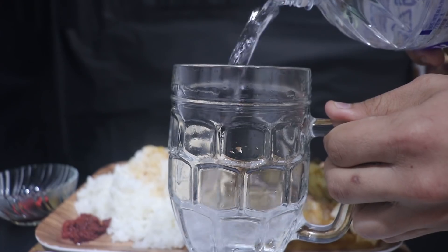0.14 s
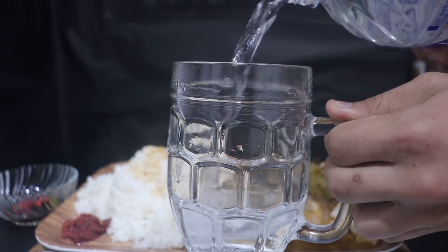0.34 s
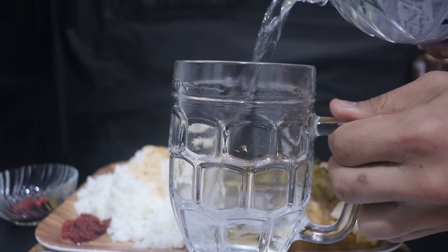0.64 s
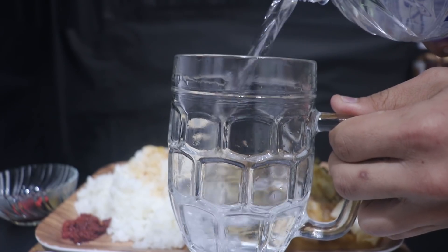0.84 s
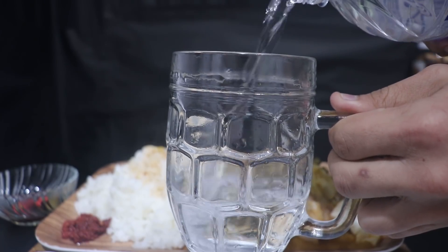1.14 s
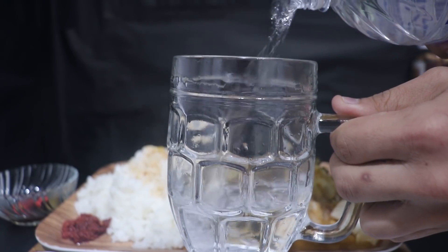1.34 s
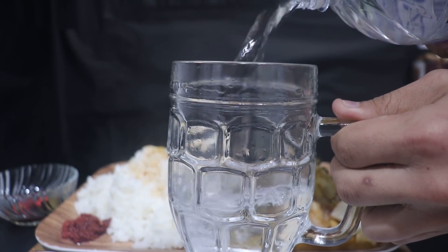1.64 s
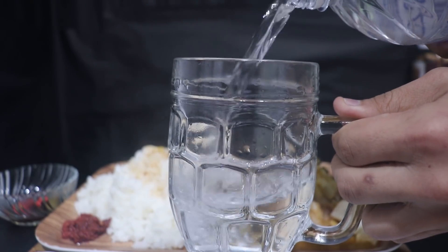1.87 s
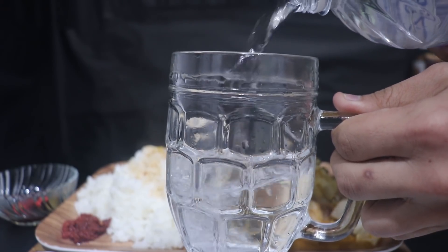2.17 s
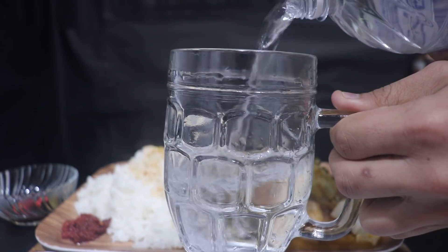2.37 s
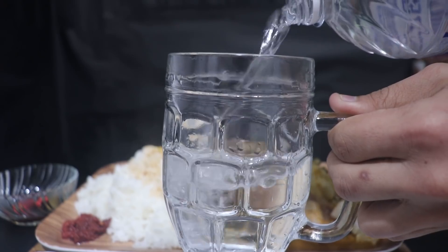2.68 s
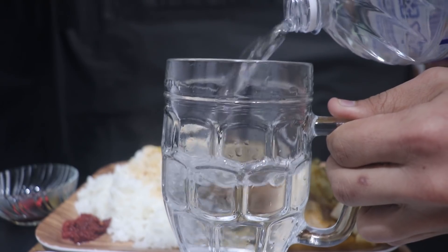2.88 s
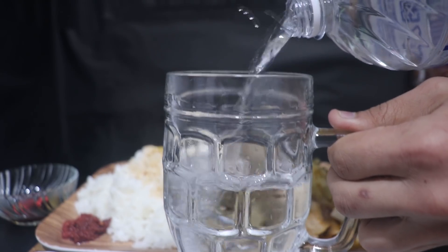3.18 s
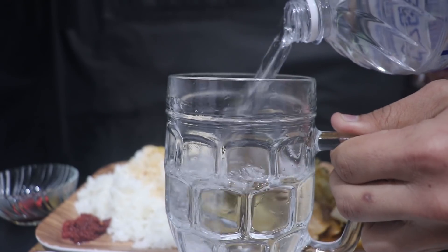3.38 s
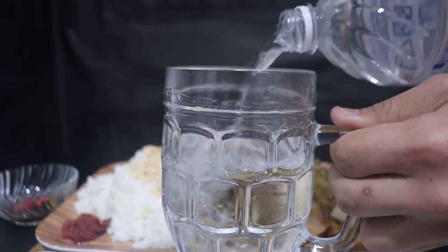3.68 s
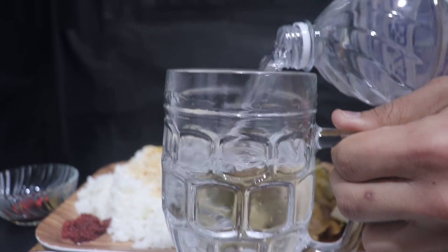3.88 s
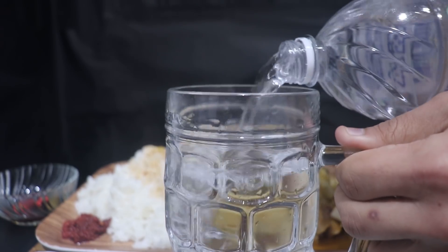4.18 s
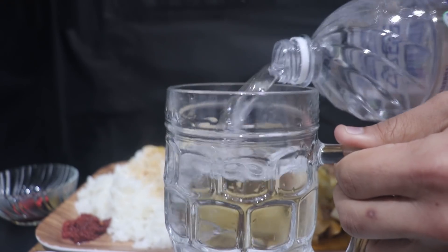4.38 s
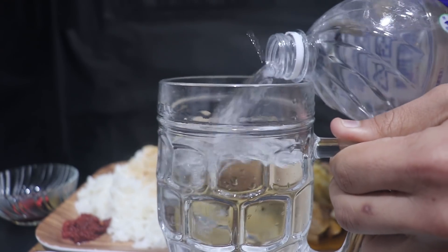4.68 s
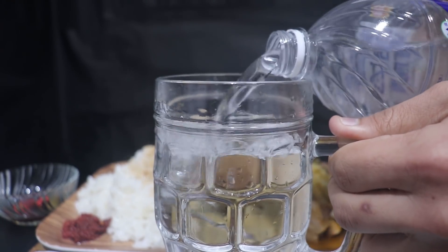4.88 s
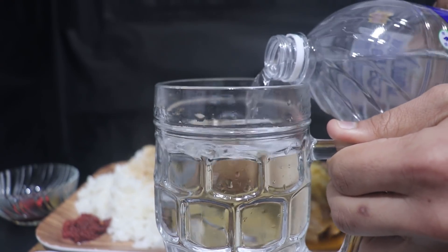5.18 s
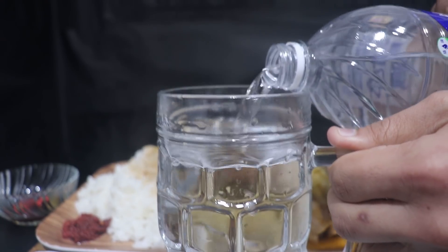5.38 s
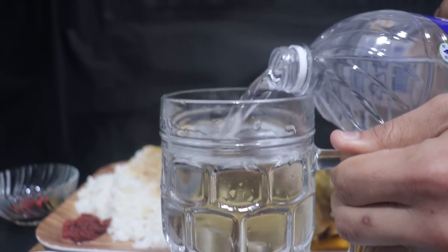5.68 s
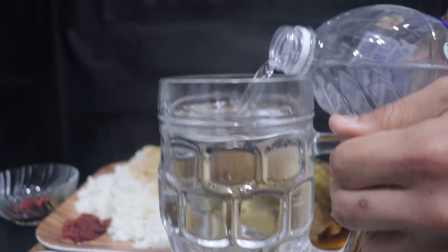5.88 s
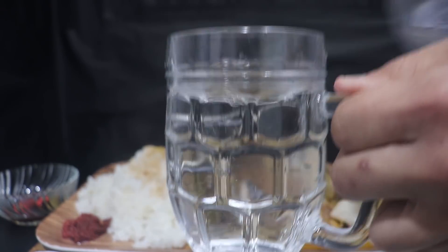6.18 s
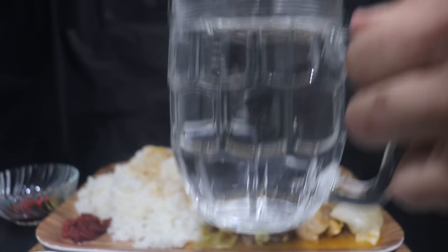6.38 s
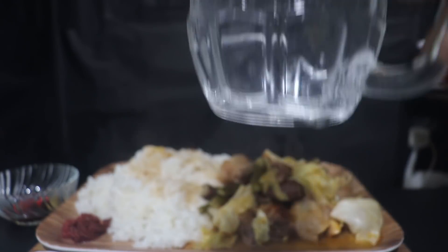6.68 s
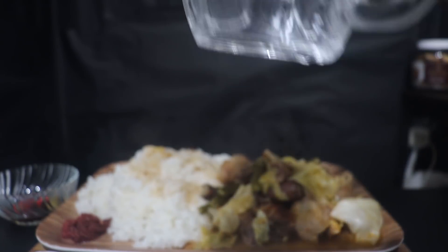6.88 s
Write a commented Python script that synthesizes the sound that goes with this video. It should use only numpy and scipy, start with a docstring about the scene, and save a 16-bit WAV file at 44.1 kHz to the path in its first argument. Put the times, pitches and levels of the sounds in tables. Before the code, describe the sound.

A close, detailed pour in a quiet small room with a faint, low steady hush. From 0 s water falls from a plastic bottle into a glass mug in lumpy slugs: sharp wet snaps, hollow round plops, churning bubbles and fine fizz, with a slight glassy ring. Under it the bottle gulps air about nine times a second, each a short downward chirp with a low hum that grows as it empties. Until about 1.4 s the hollow tone stays low, then climbs by nearly an octave towards 5 s. Strong splashes stand out around 3.1, 3.7, 4.3 and 4.6 s. From 4.2 s the spray thins to separate bright bloops and drips, ending near 5.2 s. Quiet follows until 5.95-6.2 s, when the plastic pops back with low thumps, clicks and crackles. At 6.6 s comes one short dull set-down knock, then only room hush.

```python
"""Water glugs from a plastic bottle into a glass mug close to a microphone. Each slug of water snaps on the
surface, traps ringing bubbles and fizz (damped, gliding sines and filtered noise) and sounds the air column,
a resonance whose pitch rises as the mug fills. Air gulped into the bottle chirps downward and hums.
Afterwards the plastic pops back, crackles in bursts of noise and is set down in a quiet room."""
import sys
import numpy as np
from scipy import signal
from scipy.fft import rfft, irfft, next_fast_len
from scipy.io import wavfile
from scipy.ndimage import uniform_filter1d, map_coordinates

SR = 44100
rng = np.random.default_rng(int(sys.argv[2]) if len(sys.argv) > 2 else 0)


def dump(signal):
    """Clip the signal to [-1, 1] and save it as 16-bit WAV at the path in sys.argv[1]."""
    limited = np.clip(np.atleast_2d(signal).T, -1, 1)
    pcm = np.round(limited * 32767).astype(np.int16)
    wavfile.write(sys.argv[1], SR, pcm)


N = 310023


def amp(db):
    """Decibel law: the amplitude ratio of a level in dB."""
    return 10 ** (np.asarray(db) / 20)


def unit(x):
    """Normalisation: x at rms 1."""
    return x / np.sqrt(np.mean(x ** 2) + 1e-20)


def curves(rows):
    """Linear interpolation: one value per sample for each column after the time."""
    s, *cols = np.transpose(rows)
    return [np.interp(np.arange(N) / SR, s, c) for c in cols]


def filtered(x, response):
    """Linear filtering: the spectrum of x times a response of frequency."""
    m = next_fast_len(N + 8192)
    return irfft(rfft(x, m) * response(np.fft.rfftfreq(m, 1 / SR)), m)[:N]


def coloured(x, points):
    """Spectral shaping: x filtered through (Hz, dB) points, at rms 1."""
    f, db = np.transpose(points)
    return unit(filtered(x, lambda hz: amp(np.interp(np.log(hz + 1), np.log(f), db))))


def resonance(f, square_hz, width_hz):
    """Driven damped oscillator: response at f of a mode of this squared frequency, peak 1."""
    return 1j * f * width_hz / (square_hz - f * f + 1j * f * width_hz)


def wobble(rate):
    """Slow random modulation: a smooth curve, rate knots a second."""
    knots = rng.standard_normal(int(N * rate / SR) + 4)
    return map_coordinates(knots, [np.arange(N) * rate / SR])


def add(track, s, sound):
    """Superposition: mixes a sound in at time s."""
    part = track[round(s * SR):][:len(sound)]
    part += sound[:len(part)]


def grains(per_s, low_hz, high_hz, cycles, spread_db, size):
    """Bubble resonance in bulk: damped sines of random strength and life, a few of which climb in pitch."""
    when, pitch, chance, life, climb = rng.random((round(per_s * N / SR), 5)).T[:, :, None]
    turns = low_hz * (high_hz / low_hz) ** pitch * np.arange(size) / SR
    decay = np.exp(-turns / (cycles * 10 ** (life - .5)))
    fade = (1 - np.exp(-turns)) * decay * np.hanning(2 * size)[size:]
    strength = amp(-spread_db * np.log(1 - .97 * chance))
    bend = .014 * climb ** 3  # most hold their pitch
    sound = strength * fade * np.sin(2 * np.pi * turns * (1 + bend * turns))
    where = (when * N).astype(int) + np.arange(size)
    return unit(np.bincount(where.ravel(), sound.ravel(), N)[:N])


# The air above the water. Each row: time in seconds, resonance in Hz.
AIR_COLUMN = [(0, 723), (1.4, 727), (3, 1006), (4.3, 1077), (5.2, 1400)]


def along_column(steps, play):
    """Time-varying resonance: a cross-fade over fixed filters, play(air_hz), as the column shortens."""
    hz, = curves(AIR_COLUMN)
    place = np.interp(hz, steps, np.arange(len(steps)))
    return sum(np.clip(1 - abs(place - k), 0, 1) * play(air_hz) for k, air_hz in enumerate(steps))


def air_column(x, width_hz):
    """Column resonance: the air above the water selects a band that rises as the mug fills."""
    hz, = curves(AIR_COLUMN)
    steps = np.geomspace(hz.min(), hz.max(), 14)
    return along_column(steps, lambda c: filtered(x, lambda f: resonance(f, c * c, width_hz)))


LIFT = 0.88  # how strongly the shortening column raises the mug's ringing
# The mug's ringing across its width. Each row: frequency in Hz before the column's lift,
# width in Hz, level in dB.
GLASS_MODES = [(2400, 21, 5.5), (3750, 380, -8), (5133, 35, 2)]


def mug(x):
    """Modal resonance: the mug adds its ringing to whatever strikes it, a little higher as it fills."""
    hz, = curves(AIR_COLUMN)
    steps = np.linspace(hz.min(), hz.max(), 6)

    def ring(air_hz):
        lift = (LIFT * air_hz) ** 2
        return filtered(x, lambda f: sum(amp(db) * resonance(f, c * c + lift, w) for c, w, db in GLASS_MODES))
    return x + along_column(steps, ring)


LEAD_DB_PER_S, FALL_DB_PER_S = 1103, 270  # spatter builds up before a snap and dies after it
# The steady spatter around the jet. Each row: time in seconds, level in dB.
SPRAY_LEVEL = [(0, -44), (.25, -37), (.53, -44.5), (.95, -39.5), (1.39, -45), (1.84, -39.5), (2.08, -35),
               (2.14, -46.5), (2.22, -39.5), (2.75, -45), (3.4, -43), (3.66, -40.5), (4.07, -49.5),
               (4.3, -52), (4.83, -53), (5.16, -60)]


def splash(ending):
    """Energy summation: the spatter's level in dB, from the steady spray and a burst around every snap."""
    t, (spray_db,) = np.arange(N) / SR, curves(np.vstack([SPRAY_LEVEL, ending]))
    power = amp(spray_db) ** 2
    for s, _, _, db in SNAP_ROWS:
        power += amp(db - np.maximum(LEAD_DB_PER_S * (s - t), FALL_DB_PER_S * (t - s))) ** 2
    return 10 * np.log10(power)


# The jet churning the water. Each row: time in seconds, level in dB before splashes swell it.
POUR_LEVEL = [(0.0, -59), (0.3, -39.5), (0.5, -40), (1.01, -37), (1.3, -36.5), (1.97, -41), (2.21, -39.5),
              (2.56, -34.5), (2.98, -43.5), (3.9, -37.5), (4.22, -48), (4.84, -47), (5.16, -54)]
# The churning's colour. Each row: frequency in Hz, filter gain in dB.
CHURN_COLOUR = [(150, -59), (250, -31), (480, -14), (675, -6), (1320, -6.5), (3500, -19), (4550, -49),
                (7700, -120)]


def churn(lumps, splash_db, ending):
    """Turbulent excitation: middle bubbles under the jet swell with each splash and sound the column."""
    churn_db, = curves(np.vstack([POUR_LEVEL, ending]))
    water = grains(520, 331.0, 3015, cycles=7.0, spread_db=5.5, size=700) + 0.3 * rng.standard_normal(N)
    water = unit(lumps * coloured(water, CHURN_COLOUR))
    column = unit(air_column(water, width_hz=160))
    return amp(churn_db + 0.51 * (splash_db + 42.5)) * (0.71 * water + 0.79 * column)


# The fizz's colour. Each row: frequency in Hz, filter gain in dB.
FIZZ_COLOUR = [(760, -4.5), (1300, -7), (2120, -8.5), (5180, -10), (6070, -16.5), (8910, -6), (15200, -20),
               (16500, -52)]


def fizz(lumps, splash_db):
    """Small-bubble resonance: high grains spatter and ring the mug."""
    small = grains(2600, 1100, 6500, cycles=14, spread_db=4.6, size=330) + .27 * rng.standard_normal(N)
    small += 0.57 * grains(220, 5660, 14160, cycles=9.3, spread_db=7.5, size=110)  # sparse droplet ticks
    uneven = lumps * amp(2.6 * wobble(60)) * coloured(small, FIZZ_COLOUR)
    return amp(splash_db) * unit(mug(uneven))


def stream():
    """Common modulation: churn and fizz share one lumpy flow and one splash level."""
    ending = [5.2, -80]  # seconds, dB
    splash_db = splash(ending)
    lumps = amp(2.2 * wobble(28))
    return churn(lumps, splash_db, ending) + fizz(lumps, splash_db)


HUSH_DB = -51
# Room and microphone noise. Each row: frequency in Hz, filter gain in dB.
HUSH_COLOUR = [(20, -6.5), (170, -4.5), (541, -13.5), (677, -14), (2210, -21.5), (14600, -29),
               (16800, -33.5)]


def hush():
    """Stationary noise: the steady background of room and microphone."""
    return amp(HUSH_DB) * coloured(rng.standard_normal(N), HUSH_COLOUR)


def room(x, t60):
    """Exponential reverberation: a short dull tail from nearby surfaces."""
    t = np.arange(SR // 4) / SR
    dull = uniform_filter1d(rng.standard_normal(len(t)), size=3)
    tail = dull * amp(-60 * t / t60) * (t > .003)
    return signal.fftconvolve(x, tail / np.linalg.norm(tail))[:N]


CLICK_HZ = 10300  # snaps dull above this
# Drops hitting the surface. Each row: start in seconds, level in dB, pitch in Hz,
# level in dB of the spatter thrown up.
SNAP_ROWS = [(0.019, -13.5, 9040, -36), (0.0575, -20, 3800, -34), (0.084, -18, 2260, -32.5),
             (0.156, -27, 2450, -43), (0.3147, -15.5, 7900, -41), (0.389, -32, 4360, -51),
             (0.402, -15, 4120, -33), (.413, -20, 6840, -45), (0.596, -23, 1850, -39),
             (0.6237, -37, 2600, -36), (0.734, -20.5, 3900, -34), (0.828, -28, 2200, -35.5),
             (0.902, -22, 3780, -68), (1.0707, -25.5, 3540, -30.5), (1.179, -36, 1490, -58),
             (1.262, -25, 3500, -31.5), (1.313, -27, 9450, -38.5), (1.397, -27.5, 1550, -59),
             (1.437, -19, 1690, -63), (1.5519, -20, 2760, -29), (1.663, -26, 7200, -30.5),
             (1.76, -16.5, 1570, -57), (1.878, -23.5, 2780, -32.5), (1.92, -24, 3320, -25.5),
             (1.982, -23, 3530, -28.5), (2.0475, -26.5, 5010, -32.5), (2.328, -16, 4000, -32.5),
             (2.384, -17.5, 2490, -65), (2.428, -15.5, 4520, -28.5), (2.658, -35, 1590, -61),
             (2.859, -32, 1890, -43.5), (3.087, -17, 1790, -32), (3.1105, -8.5, 5060, -25),
             (3.225, -20.5, 3280, -30), (3.302, -24.5, 3170, -38), (3.476, -26, 1770, -57),
             (3.5205, -22.5, 5500, -85), (3.569, -25, 7500, -32.5), (3.701, -15, 3610, -30),
             (3.712, -10, 5020, -40), (3.8186, -19, 4330, -34.5), (3.874, -24.5, 7600, -39),
             (3.9336, -15, 7950, -52), (4.0015, -25.5, 5770, -67), (4.087, -25, 7900, -35.5),
             (4.157, -24.5, 1490, -33.5), (4.174, -25, 3740, -35), (4.182, -22, 8350, -51),
             (4.225, -28.5, 10000, -60), (4.277, -28.5, 1940, -59), (4.327, -9.5, 5460, -34),
             (4.338, -19, 8300, -54), (4.4532, -16, 4770, -29), (4.518, -36, 3700, -33),
             (4.546, -30, 9300, -55), (4.6078, -9.5, 3030, -31), (4.6396, -25, 7700, -50),
             (4.657, -30, 7460, -61), (4.731, -24.5, 8700, -39.5), (4.8634, -19.5, 2940, -31.5),
             (5.013, -37, 4340, -41), (5.107, -29, 7700, -63)]


def snaps():
    """Impact radiation: a drop clicks, rings briefly and scatters droplets of other pitches within 25 ms."""
    out, t = np.zeros(N), np.arange(SR // 100) / SR

    def ping(hz, cycles):
        return np.sin(2 * np.pi * hz * t) * (1 - np.exp(-2 * t * hz)) * np.exp(-t * hz / cycles)
    noise = rng.standard_normal((len(SNAP_ROWS), len(t) + 2))
    clicks = (noise[:, 2:] - noise[:, :-2]) * amp(-60 * t / 0.012)  # the difference thins the bass
    for (s, db, hz, _), scatter, click in zip(SNAP_ROWS, rng.random((len(SNAP_ROWS), 7, 2)), clicks):
        add(out, s, amp(db) * (ping(hz, cycles=8.6) + hz / 20000 * click))  # small drops click hardest
        for late, pitch in scatter:
            droplet = ping(hz * 2.8 ** (pitch - .4), cycles=5.9)
            add(out, s + 0.025 * late ** 3, amp(db - 5.0 - 18.5 * late) * droplet)
    return filtered(out, lambda f: 1 / (1 + 1j * f / CLICK_HZ))


WITH_SNAP_S = .01  # this close to a snap a slug has hit hard


def hard(s):
    """Coincidence: true when a snap lands at about time s."""
    return min(abs(s - row[0]) for row in SNAP_ROWS) < WITH_SNAP_S


SLAP_S = 0.00026  # time scale of the slap's pulse


def slap():
    """Impact pressure: one brief two-sided pulse."""
    u = np.arange(SR // 200) / SR / SLAP_S
    return u * (u - 2) * np.exp(1 - u)


REACH_OCTAVES = 0.76  # a climbing pocket has reached the surface after this glide


def pocket(s, db, hz, glide, rise, t60, waver):
    """Bubble oscillation: a pocket swells, rings, glides, then bursts; a sudden one closes with a thud."""
    rise = max(rise, 1e-4)
    life = min(t60 / 3, REACH_OCTAVES / max(glide, 1))
    t = np.arange(round((rise + life + 0.047) * SR)) / SR
    octaves = glide * np.minimum(t, rise + life + 0.0113)
    phase = 2 * np.pi * np.cumsum(hz * 2 ** octaves * waver[round(s * SR):][:len(t)]) / SR
    swell = np.sin(np.pi / 2 * np.clip(t / rise, 0, 1)) * amp(-60 * np.maximum(t - rise, 0) / t60)
    thud = 0.0051 / (rise + 0.000042) * t * hz * np.exp(-1.6 * t * hz)
    burst = amp(-60 * np.maximum(t - rise - life, 0) / 0.042)
    return amp(db) * (swell * burst + thud) * np.sin(phase)


# swell and t60 in cycles; a climbing pocket rings longer, in cycles for each octave a second
RISE_CYCLES, RING_CYCLES, RING_PER_GLIDE = 0.63, 58, 11.5
# a hard hit slaps over a pocket (dB re pocket); pockets above BIG_HZ slap less, and all harder as the mug fills
SLAP_DB, BIG_HZ = 11, 550
# Air pockets trapped under the surface. Each row: start in seconds, level in dB, starting pitch in Hz,
# glide in octaves per second.
POCKET_ROWS = [(.054, -31, 787, 3.5), (0.157, -26.5, 1640, 1), (0.317, -21.5, 1610, -13),
               (.828, -23, 528, 6.5), (1.02, -30, 1810, 8), (1.044, -25.5, 528, 2), (1.438, -25, 442, -4),
               (1.522, -35.5, 426, 6), (1.66, -33, 356, 7), (1.747, -23.5, 492, 4), (1.919, -31.5, 320, 2),
               (2.047, -30.5, 447, -0.5), (2.287, -26.5, 497, -7.5), (2.43, -22.5, 338, 0),
               (2.433, -21.5, 1480, -6), (2.556, -26, 374, 1), (2.655, -24.5, 360, -2.5),
               (2.292, -22, 808, -0.5), (2.86, -19, 345, 4), (2.865, -23.5, 633, 10),
               (3.107, -22.5, 1570, 7), (3.11, -39.5, 484, -11), (3.224, -26, 505, -4.5),
               (3.566, -21.5, 400, 0.5), (3.585, -25.5, 821, 21.5), (3.695, -31, 340, 3.5),
               (3.816, -17.5, 679.5, 19), (3.817, -24, 489, 2.5), (3.933, -24, 365.5, 1.5),
               (3.934, -19.5, 770, 9), (4.042, -29, 794, 12), (4.175, -30.5, 554, 1.5),
               (4.328, -23.5, 377, -3.5), (4.43, -36.5, 1870, -3), (4.453, -39.5, 418, 11),
               (4.503, -46, 616, 39), (4.517, -24.5, 1890, -6), (4.608, -24, 858, 9.5), (4.61, -20, 419, 2),
               (4.629, -24, 987, 4.5), (4.736, -33.5, 563, 10), (4.815, -37.5, 1130, 3),
               (4.876, -38.5, 519, 8), (4.902, -40, 624, 21.5), (4.88, -24, 1460, -3), (5.021, -21, 538, 1)]


def trapped_pockets(waver):
    """Bubble damping: each trapped pocket rings for a number of its own cycles."""
    out, (column,) = np.zeros(N), curves(AIR_COLUMN)
    for s, db, hz, glide in POCKET_ROWS:
        t60 = (RING_CYCLES + RING_PER_GLIDE * max(glide, 0)) / hz
        add(out, s, pocket(s, db, hz, glide, RISE_CYCLES / hz, t60, waver))
        fullness = column[round(s * SR)] / column.max()
        add(out, s, hard(s) * amp(db + SLAP_DB) * min(BIG_HZ / hz, 1) * fullness * slap())
    return out


# the hum's pitch varies less than the neck bubble's, whose chirp narrows as the bottle empties
HUM_SCATTER, NECK_DROP_PER_S = 0.14, 0.049
# Air gulped into the bottle neck. Each row: start in seconds, level in dB.
GLUG_ROWS = [(0.064, -36), (0.171, -33), (0.274, -35), (0.387, -34), (0.482, -35), (0.615, -30),
             (0.71, -29.5), (0.831, -28.5), (0.935, -34), (1.047, -31), (1.107, -29.5), (1.226, -23.5),
             (1.31, -32), (1.445, -28), (1.546, -35), (1.699, -29), (1.841, -25.5), (1.989, -25.5),
             (2.096, -31), (2.178, -30), (2.229, -30.5), (2.345, -34), (2.471, -26), (2.524, -27),
             (2.664, -28), (2.769, -26.5), (2.913, -27), (3.031, -30.5), (3.145, -29), (3.256, -28.5),
             (3.379, -33.5), (3.516, -30.5), (3.635, -27), (3.763, -28.5), (3.888, -31), (3.999, -37),
             (4.075, -26.5), (4.159, -31), (4.27, -34.5), (4.548, -25.5), (5.031, -41)]


def glugs():
    """Cavity resonance: the neck bubble grows, so its pitch falls; the bottle's air hums, more as it empties."""
    out, t = np.zeros(N), np.arange(SR // 6) / SR
    for (s, db), vary in zip(GLUG_ROWS, rng.normal(1, 0.07, len(GLUG_ROWS))):
        hz = vary * (120 + 330 * (1 - NECK_DROP_PER_S * s) * np.exp(-t / 0.0049))
        neck = amp(-60 * t / 0.043) * np.sin(2 * np.pi * np.cumsum(hz) / SR)
        hum_level = 0.26 * min(0.16 + s / 3, 1)
        hum_shape = (1 - np.exp(-t / 0.0063)) * amp(-60 * t / 0.33)
        hum = hum_level * hum_shape * np.sin(2 * np.pi * 108 * vary ** HUM_SCATTER * t)
        add(out, s, amp(db) * (neck + hum))
    return out


PULL_PER_S = 12  # slide toward the column: octaves a second per octave of distance; less as it shortens
PLOP_RISE_S, SHARPEN = 0.0059, 2.78  # swell in the empty mug; exponent that sharpens it as the column shortens
HARD_RISE, PLOP_SLAP_DB = 0.6, -15.5  # a hard hit shortens the swell and adds a slap (dB re plop)
# each plop sheds a smaller pocket: dB re plop, widest pitch ratio, fastest octaves a second, t60 in cycles
SHED_DB, SHED_SPAN, SHED_GLIDE, SHED_CYCLES = -18, 2.6, 16, 40
# Slugs of water that set the air column ringing. Each row: start in seconds, level in dB,
# starting pitch in Hz, t60 in seconds.
PLOP_ROWS = [(.125, -22.5, 670, 0.032), (.204, -15, 690, 0.024), (.219, -12, 678, 0.04),
             (.277, -21, 663, 0.048), (.298, -19, 627, 0.029), (.315, -16.5, 588, 0.13),
             (.353, -19.5, 658, 0.15), (0.625, -16.5, 880, 0.041), (.645, -15.5, 690, 0.034),
             (.661, -13.5, 676, 0.063), (0.696, -12.5, 674, 0.04), (.733, -8.5, 795, 0.026),
             (.749, -13.5, 680, 0.099), (.827, -15, 703, 0.11), (.849, -12, 682, 0.062),
             (.902, -15.5, 730, 0.04), (.915, -18, 688, 0.057), (.94, -14, 756, 0.08),
             (.955, -11.5, 678, 0.078), (.99, -15.5, 670, 0.018), (1.043, -16.5, 683, 0.078),
             (1.079, -7, 750, 0.034), (1.178, -9, 867, 0.016), (1.188, -14.5, 680, 0.093),
             (1.236, -20.5, 770, 0.053), (1.262, -8, 710, 0.015), (1.436, -18.5, 694, 0.026),
             (1.521, -16, 760, 0.014), (1.556, -15, 774, 0.073), (1.588, -19, 780, 0.032),
             (1.676, -19, 708, 0.038), (1.718, -9, 786, 0.012), (1.762, -12, 820, 0.03),
             (1.78, -15.5, 858, 0.031), (1.893, -12, 742, 0.01), (1.923, -16, 884, 0.035),
             (1.994, -16.5, 720, 0.065), (2.016, -18, 823, 0.066), (2.045, -16, 875, 0.018),
             (2.43, -8.5, 910, 0.016), (2.44, -9.5, 842, 0.045), (2.478, -18.5, 880, 0.056),
             (2.533, -15, 885, 0.11), (2.656, -13, 947, 0.05), (2.859, -11, 943, 0.064),
             (2.962, -16, 1054, 0.037), (3.108, -14, 952, 0.054), (3.1103, -10.5, 1320, 0.0064),
             (3.226, -19, 1116, 0.027), (3.566, -8, 932, 0.031), (3.679, -23.5, 970, .05),
             (3.711, -18, 943, 0.07), (3.834, -10, 981, 0.067), (3.869, -11.5, 1084, 0.052),
             (3.888, -22, 1030, 0.05), (4.047, -14.5, 1133, 0.077), (4.088, -20.5, 1313, 0.026),
             (4.075, -16, 1193, 0.013), (4.179, -16.5, 1130, 0.078), (4.337, -10, 1102, 0.13),
             (4.452, -13, 1291, 0.099), (4.627, -11, 1510, .04), (4.637, -14.5, 1640, 0.032),
             (4.751, -24, 1580, 0.056), (4.88, -23, 1091, 0.15), (5.009, -26, 965, 0.034),
             (5.025, -22.5, 1503, 0.063)]


def plops(waver):
    """Coupled resonance: each plop slides toward the air column's pitch and sheds a smaller pocket."""
    out, (column,) = np.zeros(N), curves(AIR_COLUMN)
    for (s, db, hz, t60), (late, higher, climb) in zip(PLOP_ROWS, rng.random((len(PLOP_ROWS), 3))):
        air_hz = column[round(s * SR)]
        depth = (column[0] / air_hz) ** SHARPEN  # 1 in the empty mug
        rise = PLOP_RISE_S * depth * (HARD_RISE if hard(s) else 1)
        glide = PULL_PER_S * depth * np.log2(air_hz / hz)
        add(out, s, pocket(s, db, hz, glide, rise, t60, waver))
        add(out, s, hard(s) * amp(db + PLOP_SLAP_DB) * slap())
        shed_s, shed_hz = s + late * t60, hz * SHED_SPAN ** higher
        shed_t60 = SHED_CYCLES / shed_hz
        add(out, shed_s, pocket(shed_s, db + SHED_DB, shed_hz, SHED_GLIDE * climb, rise, shed_t60, waver))
    return out


FLUTTER_DB = 2  # unsteadiness of the ringing


def bubbles():
    """Shape perturbation: the shaking surface makes every pocket's and plop's pitch and level waver."""
    waver = 1 + 0.031 * wobble(70)
    return (plops(waver) + trapped_pockets(waver)) * amp(FLUTTER_DB * wobble(110))


# Small creases in the plastic. Each row: start in seconds, level in dB, pitch in Hz.
CREASE_ROWS = [(5.951, -41, 5700), (6.025, -40, 7900), (6.061, -35, 3620), (6.086, -37, 4300)]


def creases():
    """Impulsive buckling: each small crease clicks as a quickly damped sine."""
    out, t = np.zeros(N), np.arange(SR // 5) / SR
    for s, db, hz in CREASE_ROWS:
        add(out, s, amp(db - 60 * t / 0.014) * (1 - np.exp(-t * hz)) * np.sin(2 * np.pi * hz * t))
    return out


# The bottle's modes. Each row: frequency in Hz, relative level in dB, t60 in seconds.
WALL_MODES = [(717, -6, 0.07), (960, -3, 0.07), (1583, -2, 0.063)]
# Plastic crackles and the set-down. Each row: start in seconds, level in dB before a common trim,
# t60 in seconds, tilt in dB per octave.
CRACKLE_ROWS = [(5.979, -40, 0.037, -6), (6.042, -28, 0.03, 2), (6.056, -26.5, 0.11, -5.5),
                (6.127, -29.5, 0.022, -1.5), (6.156, -38, 0.018, -1), (6.586, -27, 0.07, 0.5),
                (6.59, -27, 0.18, -5)]


def crackles():
    """Modal excitation: crackles are tilted noise bursts, and the dull ones ring the wall most."""
    out, t = np.zeros(N), np.arange(SR // 5) / SR
    f = np.fft.rfftfreq(len(t), 1 / SR) + 1
    wall = sum(amp(level - 60 * t / decay) * np.sin(2 * np.pi * c * t) for c, level, decay in WALL_MODES)
    noises = rng.standard_normal((len(CRACKLE_ROWS), len(t)))
    for (s, db, t60, tilt_db), noise in zip(CRACKLE_ROWS, noises):
        colour = amp(tilt_db * np.log2(f / 1500)) / (1 + (520 / f) ** 4) / (1 + (f / 9500) ** 4)
        burst = unit(irfft(rfft(noise) * colour, len(t)))
        add(out, s, amp(db - 6.5 - 60 * t / t60) * (1 - np.exp(-t / 0.00066)) * burst)
        add(out, s, amp(db - 20 - 2.64 * tilt_db) * wall)
    return out


POP_S = 0.048  # until the grip stills it
# The bottle wall springing back. Each row: start in seconds, level in dB, pitch in Hz.
POP_ROWS = [(5.98, -29.5, 192), (6.057, -39.5, 226)]


def pops():
    """Snap-through: the wall springs back with a low ring."""
    out, t = np.zeros(N), np.arange(SR // 5) / SR
    shape = np.cos(np.pi / 2 * np.minimum(t / POP_S, 1)) * (1 - np.exp(-t / 0.0015))
    for s, db, hz in POP_ROWS:
        add(out, s, amp(db) * shape * np.sin(2 * np.pi * hz * t))
    return out


def scene():
    """Direct and reverberant sound: all near sources, their room tail and the hush."""
    near = stream() + mug(snaps()) + bubbles() + glugs() + creases() + crackles() + pops()
    tail = amp(-15.5) * room(near, t60=.14)
    return (near + tail + hush())[None]


TOP_HZ = 16200


def record(dry):
    """Band limiting: nothing passes above the top frequency."""
    return filtered(dry[0], lambda hz: hz < TOP_HZ)[None]


dry = scene()
out = record(dry)
dump(out)
```